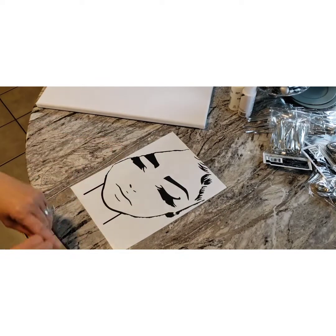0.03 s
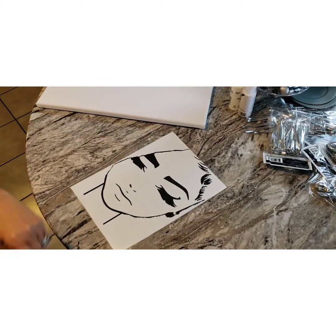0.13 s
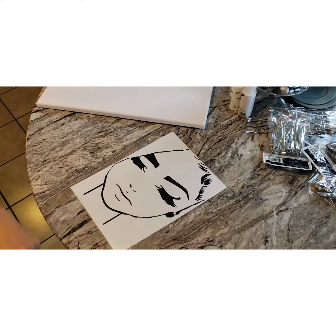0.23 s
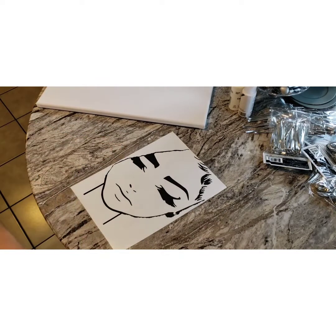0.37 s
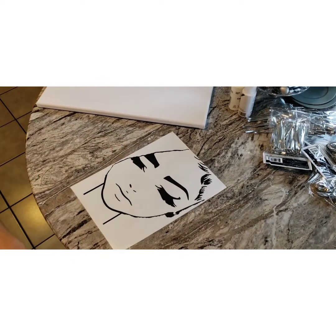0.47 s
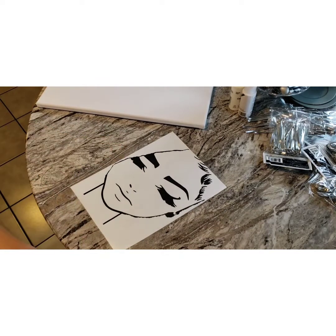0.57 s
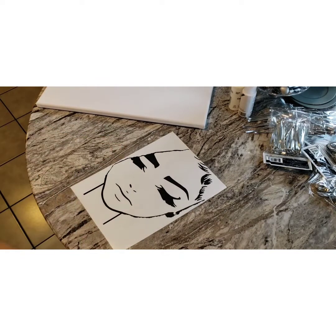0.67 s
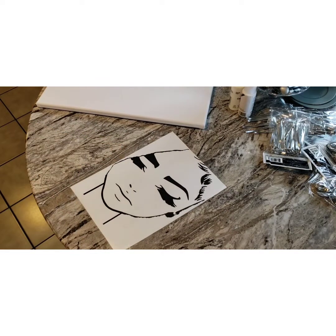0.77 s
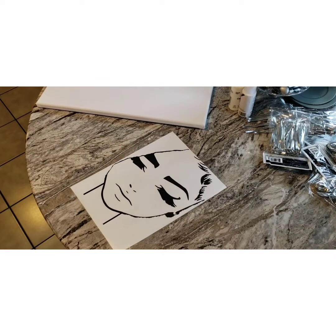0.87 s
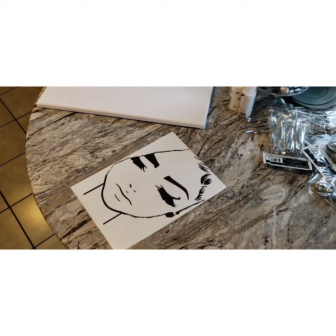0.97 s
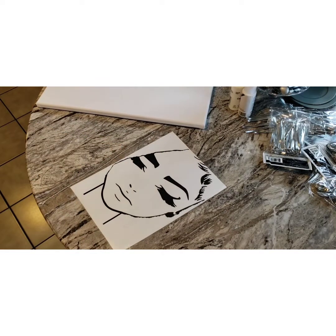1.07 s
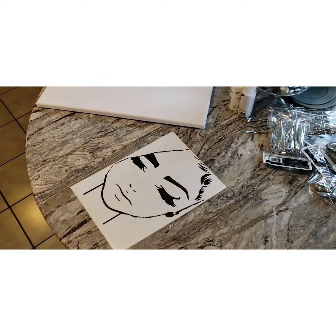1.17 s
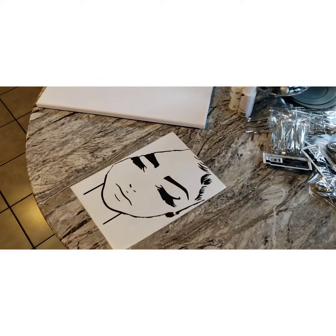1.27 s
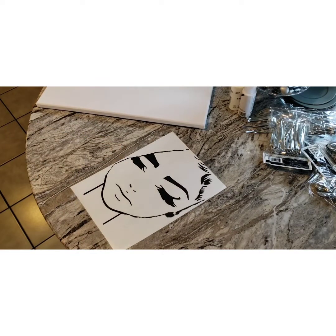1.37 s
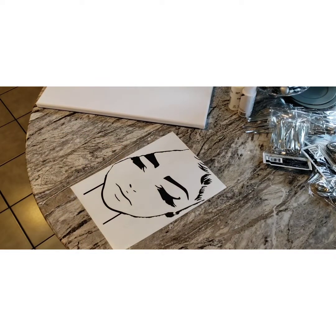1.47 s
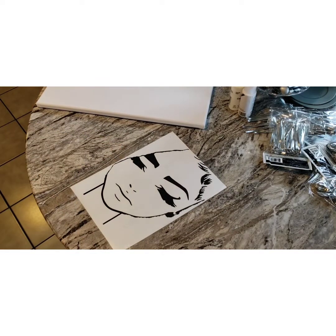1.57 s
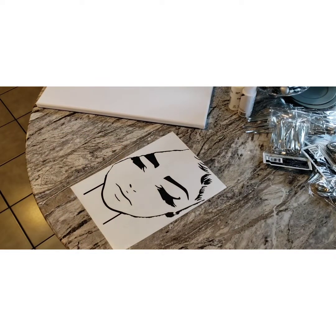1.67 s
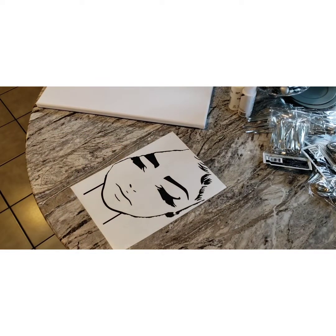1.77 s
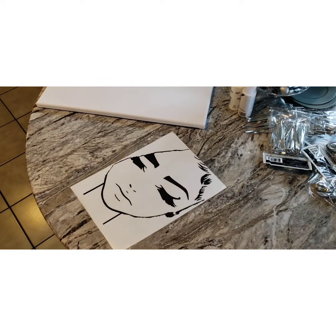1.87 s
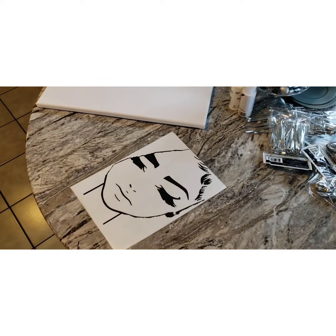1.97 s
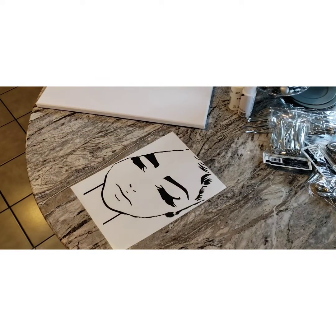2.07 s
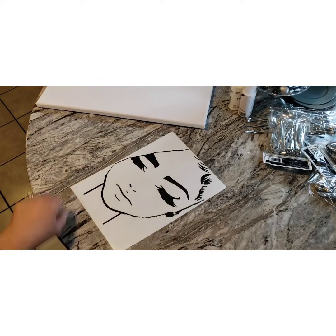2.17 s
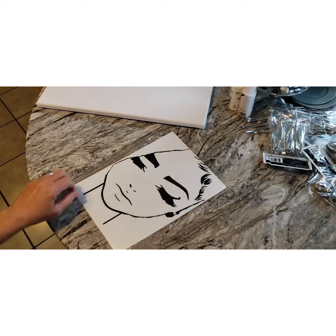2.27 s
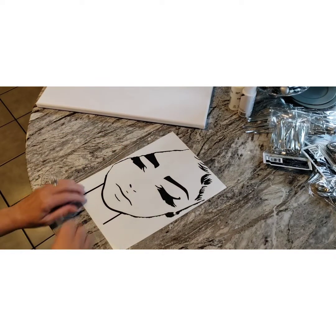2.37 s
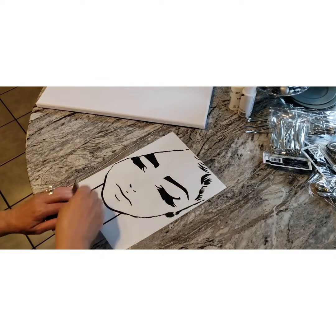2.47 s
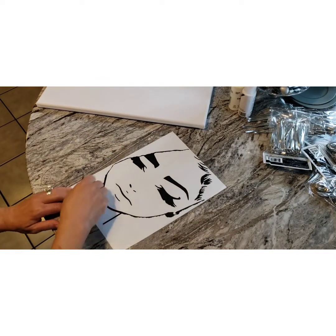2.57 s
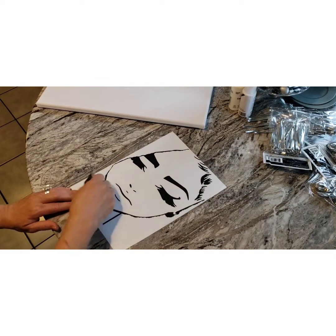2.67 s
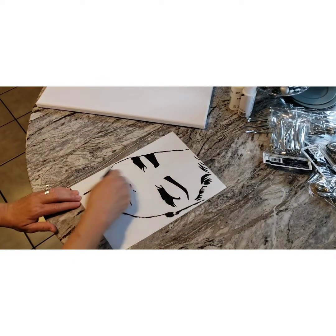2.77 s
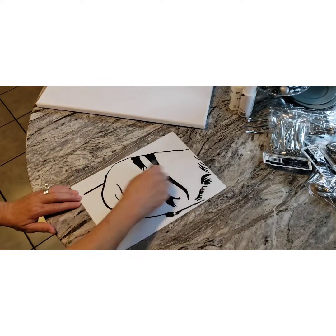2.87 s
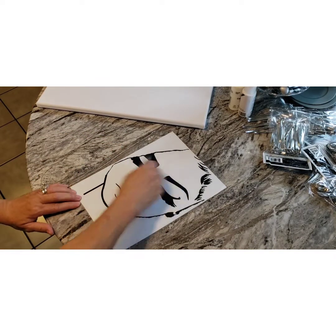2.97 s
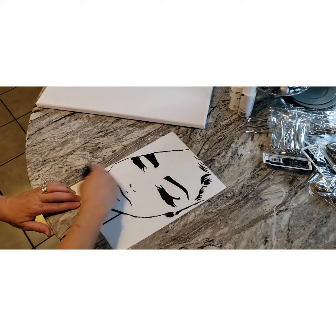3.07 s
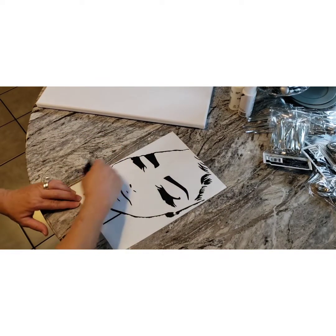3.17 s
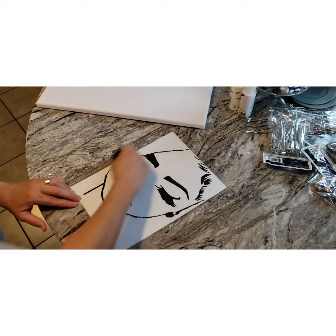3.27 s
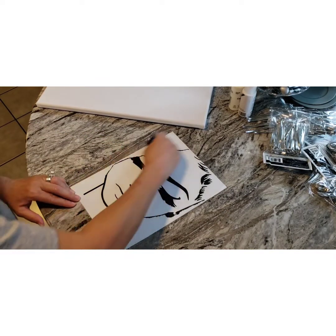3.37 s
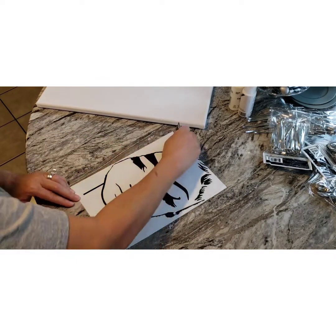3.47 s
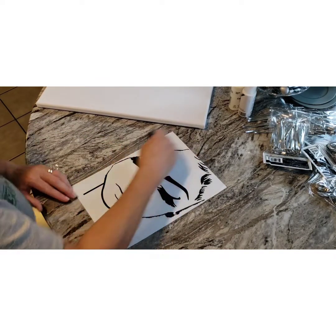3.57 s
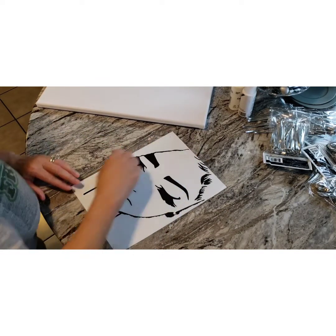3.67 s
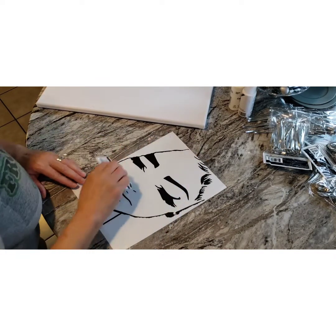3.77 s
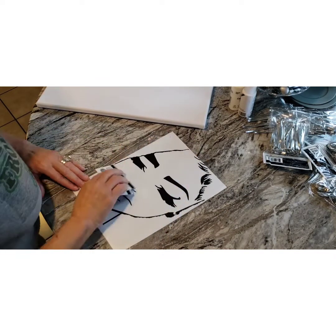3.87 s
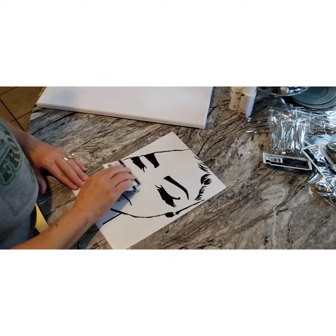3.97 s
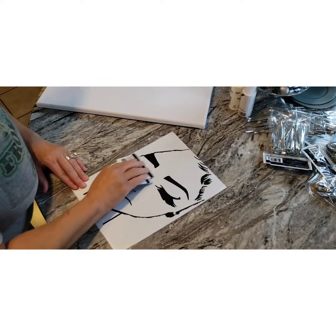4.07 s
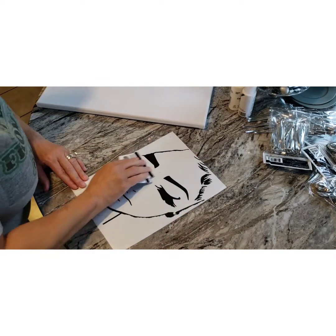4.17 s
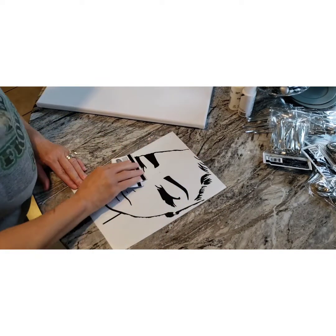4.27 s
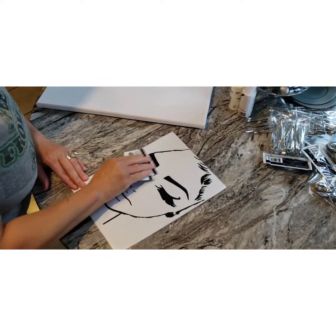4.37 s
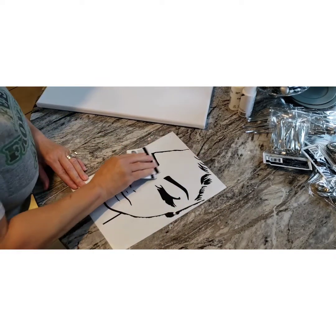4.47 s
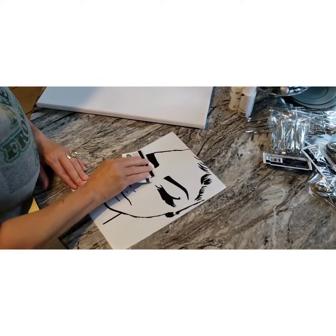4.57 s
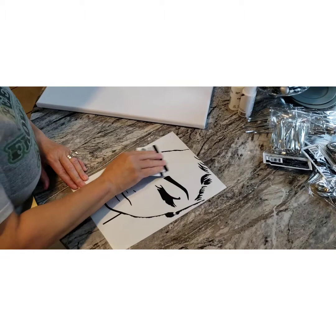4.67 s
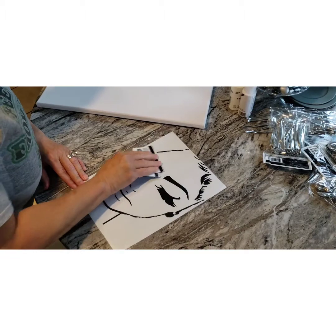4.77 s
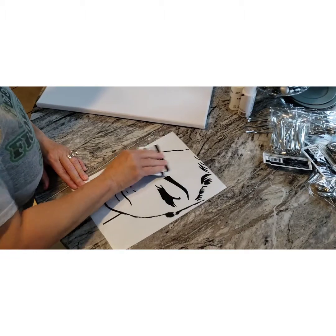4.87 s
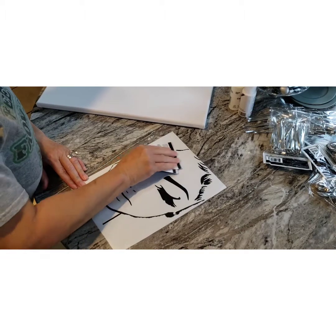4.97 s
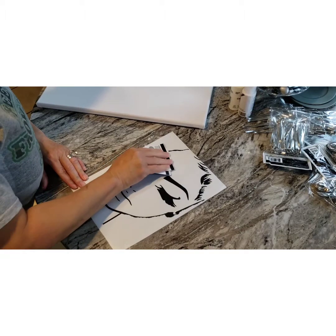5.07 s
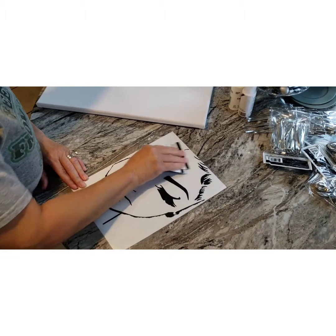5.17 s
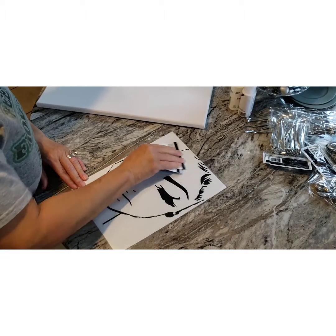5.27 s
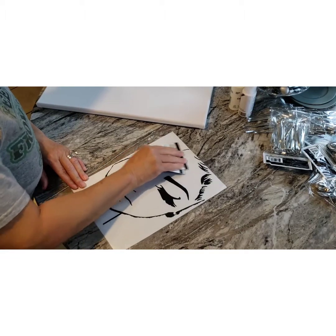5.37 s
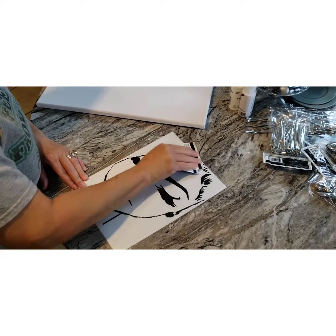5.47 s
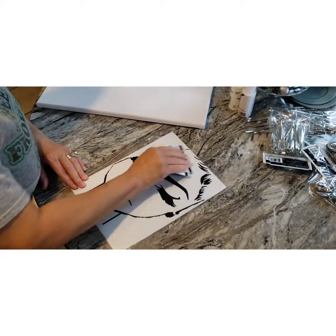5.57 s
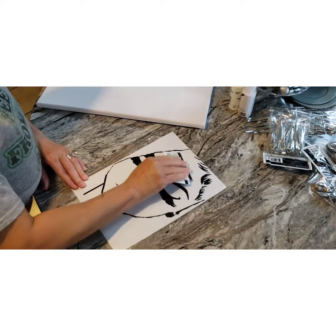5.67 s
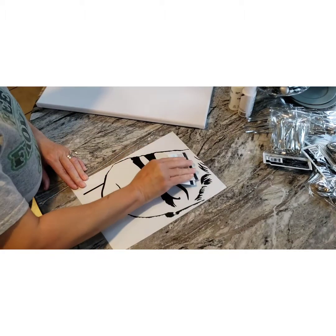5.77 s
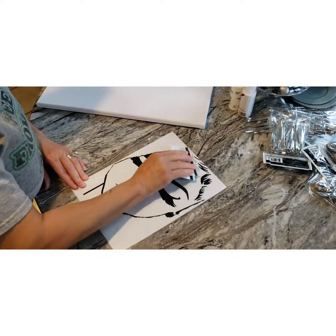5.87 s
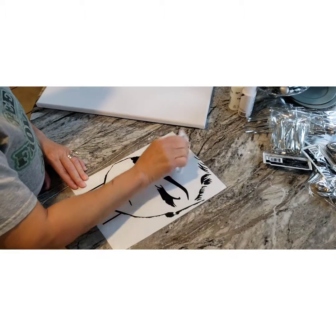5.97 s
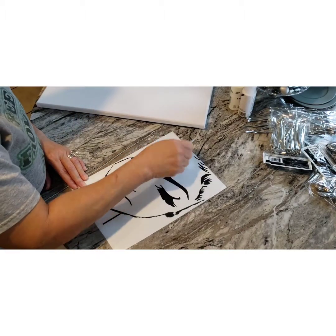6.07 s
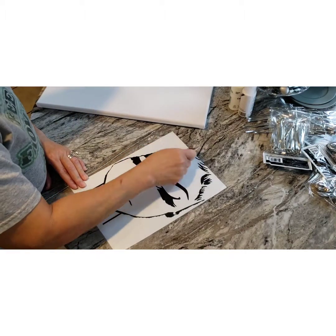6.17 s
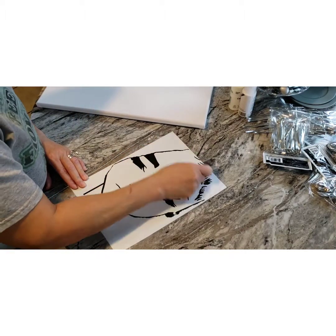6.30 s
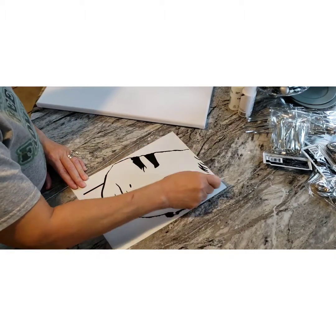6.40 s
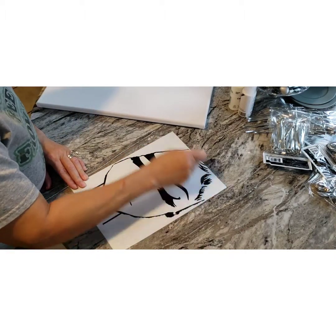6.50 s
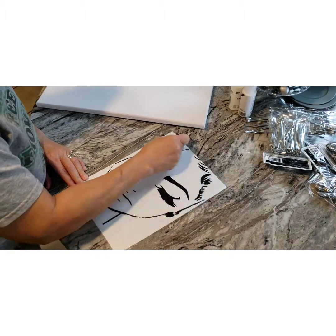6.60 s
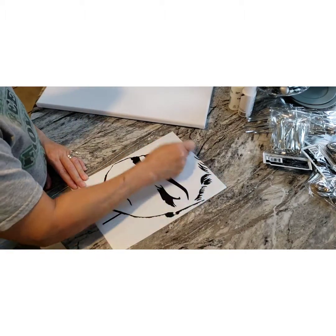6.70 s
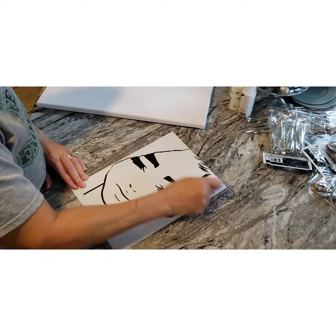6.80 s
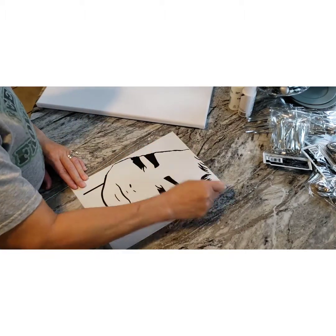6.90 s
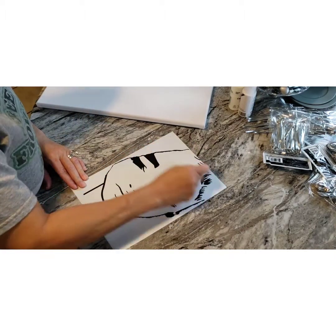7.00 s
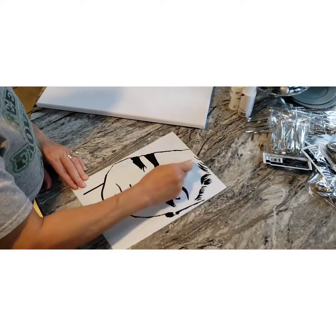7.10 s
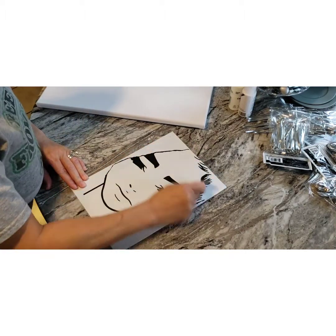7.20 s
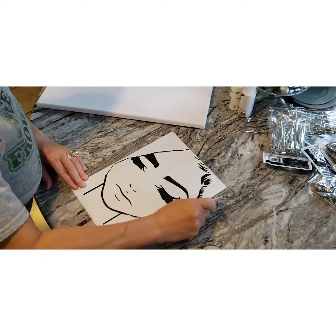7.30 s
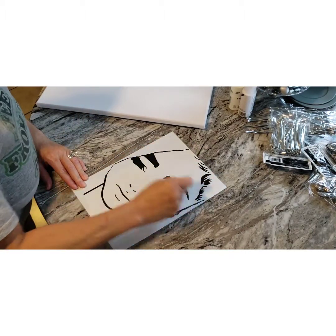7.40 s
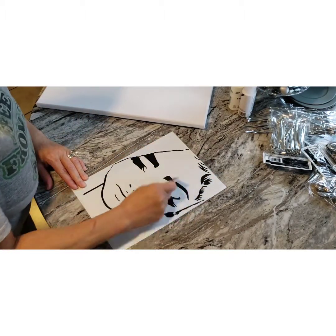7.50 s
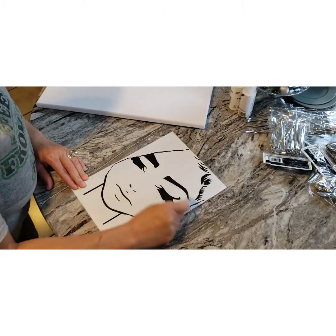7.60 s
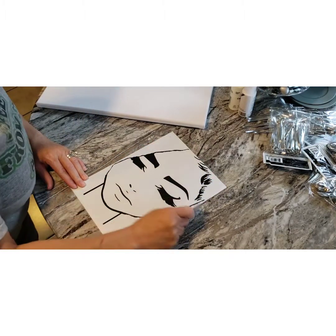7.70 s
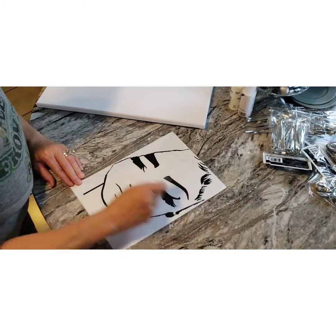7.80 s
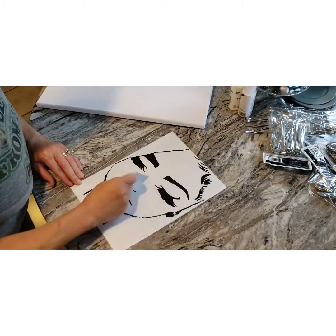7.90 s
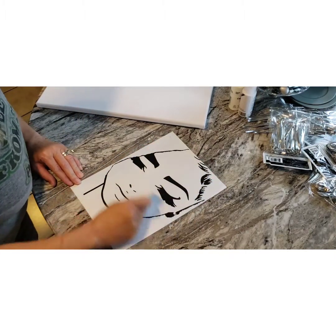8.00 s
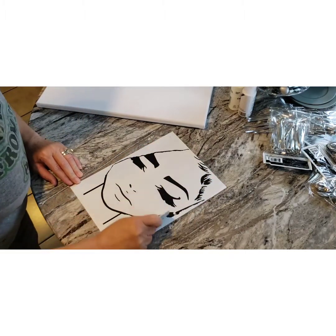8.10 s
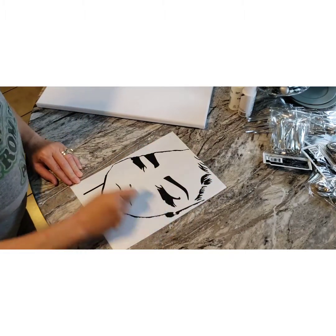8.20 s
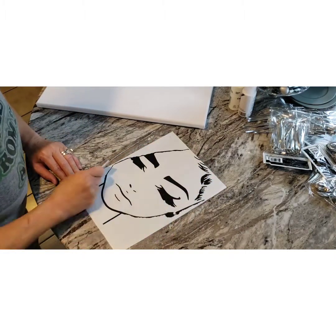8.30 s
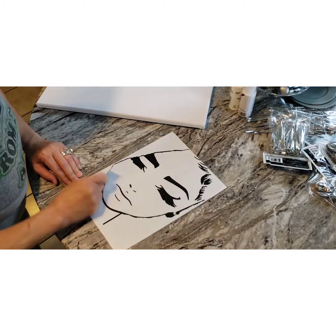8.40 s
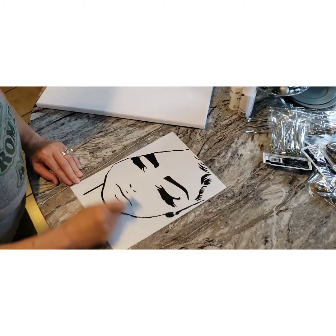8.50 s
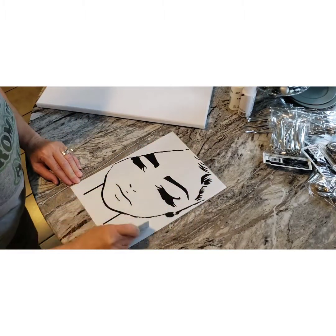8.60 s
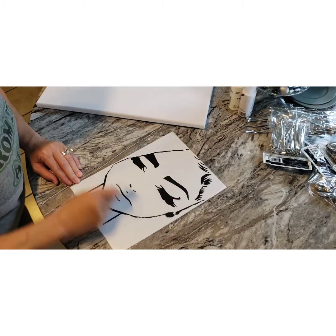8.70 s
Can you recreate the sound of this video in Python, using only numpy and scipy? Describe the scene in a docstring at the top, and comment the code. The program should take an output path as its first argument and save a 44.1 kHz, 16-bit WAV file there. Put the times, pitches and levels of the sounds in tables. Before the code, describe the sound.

Hard plastic card scrapes over a smooth sheet on a stone counter: two raspy opening strokes, soft quick rubbing, then six firm strokes over faint hum.

```python
"""Card burnishing vinyl on a kitchen counter

Hands brush a stone countertop and an appliance hums; after soft knocks and taps a plastic card makes two opening
strokes on vinyl and tape, rubs lightly to and fro, gives two short hissing scrapes that lead into the first of
six firm strokes, and its edge lands as these begin. Sticking and slipping are random kicks and noise that ring
the card and drum on the sheet; hands are filtered grain, the hum is sine lines over air noise. Random echoes
place card and hands in a small room, in stereo."""
import sys
import numpy as np
from scipy import signal
from scipy.fft import rfft, irfft, next_fast_len
from scipy.io import wavfile
from scipy.ndimage import map_coordinates

SR = 44100
rng = np.random.default_rng(int(sys.argv[2]) if len(sys.argv) > 2 else 0)


def wav_record(signal):
    """Record a signal, one row per channel, as 16-bit PCM in the file named by sys.argv[1]."""
    frames = np.transpose(np.atleast_2d(signal))
    bounded = np.clip(frames, -1, 1)
    # unit amplitude maps onto the largest positive 16-bit level
    quanta = np.round(bounded * 32767).astype(np.int16)
    wavfile.write(sys.argv[1], SR, quanta)


N = 385821  # length in samples

# Levels of card and hands are those at the source, before the room.
# hands brushing counter and sheet: start_s, rise_s, fade_s, rub_db, swish_db
HAND_BRUSHES = [(0, 0.0033, 0.053, -60.5, -65), (.12, .13, .12, -86, -68.5), (.42, .08, .09, -94, -71),
                (0.721, 0.035, 0.12, -76.5, -78), (.96, .02, 0.088, -79.5, -79.5),
                (1.42, 0.084, .08, -79.5, -76.5), (2.176, 0.066, 0.083, -68, -77),
                (2.27, 0.08, 0.11, -76, -64), (2.43, 0.029, 0.14, -72.5, -65), (2.63, 0.13, .08, -61, -71),
                (3.0, 0.041, .05, -64, -67.5), (3.7, 0.061, 0.08, -80, -70.5),
                (5.93, 0.053, 0.12, -87.5, -72)]
# motor lines of the appliance: pitch_hz, level_db
MOTOR_LINES = [(91.5, -73), (118.4, -67), (177.6, -61), (236.9, -83.5), (306.8, -68.5), (355.3, -67),
               (446.8, -70), (532.9, -77.5)]
# soft knocks and taps, and the card's edge landing: start_s, ring_db, crack_db, thud_db, ring_hz
KNOCKS_AND_LANDINGS = [(.762, -83, -95, -80, 1250), (2.573, -80, -78, -59, 2160),
                       (2.607, -57.5, -56.5, -58.5, 2820), (3.084, -45.5, -52, -73, 1850),
                       (5.937, -74, -86, -84, 1600), (6.15, -66, -61.5, -50.5, 1200),
                       (6.157, -54.5, -52, -54, 2280), (6.643, -55, -59.5, -58, 2170),
                       (7.104, -49.5, -48, -47.5, 1800), (7.51, -45.5, -49, -52, 1750),
                       (7.931, -58.5, -55.5, -55.5, 1860), (8.336, -54.5, -52.5, -51, 1560)]
# soft, deep bumps as weight shifts on the counter: start_s, level_db
WEIGHT_SHIFTS = [(2.431, -62), (5.48, -54), (7.109, -63), (7.515, -60), (7.936, -62), (8.344, -55)]
# firm strokes: start_s, speed_up_s, lift_off_s, rasp_db, scratch_db, hiss_db, drumming_db,
# card_resonance_hz, nominal_width_hz
FIRM_STROKES = [ (2.745, 0.17, 0.027, -31.5, -43, -38.5, -54.5, 2020, 1110),
                (3.087, 0.015, .02, -37.5, -46.5, -56, -65, 1890, 1100),
                (3.17, 0.098, 0.13, -33.5, -56, -46, -62.5, 1980, 960),
                (3.29, 0.15, 0.07, -33.5, -42.5, -42.5, -52.5, 2080, 1220),
                (6.289, 0.089, 0.072, -40.5, -52.5, -48.5, -49.5, 1520, 1680),
                (6.67, 0.18, 0.083, -36.5, -36.5, -38.5, -52, 1730, 1220),
                (7.115, 0.18, 0.049, -33.5, -40.5, -41.5, -56.5, 1640, 1087),
                (7.515, 0.14, 0.055, -37.5, -51.5, -45, -54, 1600, 1270),
                (7.95, 0.078, 0.088, -31.5, -43.5, -40.5, -56, 1660, 1200),
                (8.405, 0.16, 0.069, -33.5, -40.5, -40, -59.5, 1795, 1380)]
# the edge catching on a ridge of vinyl: start_s, level_db
RIDGE_CATCHES = [(3.373, -35), (6.289, -52), (6.768, -34), (7.281, -42), (8.023, -38), (8.543, -32.5)]
# light rubs to and fro, then two short hissing scrapes leading into the first firm stroke:
# start_s, speed_up_s, rasp_db, hiss_db
LIGHT_SCRAPES = [(3.829, 0.031, -53, -56), (3.865, 0.043, -53.5, -70), (3.99, 0.047, -48.5, -59.5),
                 (4.05, 0.053, -51.5, -55), (4.189, 0.041, -55, -53.5), (4.339, 0.062, -50, -49.5),
                 (4.485, 0.041, -56.5, -56.5), (4.631, 0.051, -51, -50), (4.74, 0.041, -58, -60),
                 (4.88, 0.062, -49, -49.5), (5.0, 0.042, -59, -59), (5.146, 0.039, -50.5, -51),
                 (5.261, 0.033, -59, -61.5), (5.4, 0.057, -49.5, -52.5), (5.555, 0.027, -43, -49.5),
                 (6.195, 0.031, -49, -51), (6.245, .045, -48.5, -55.5)]
# the hand leaning into the counter: start_s, boom_db
HAND_LEANS = [(4.019, -48), (4.068, -45), (4.157, -48), (5.482, -37.5), (5.557, -52), (6.8, -46),
              (6.89, -45)]
# low modes of the sheet on the counter: pitch_hz, width_hz, level_db
SHEET_MODES = [(72, 55, -1.5), (211.4, 85, 3.5), (369, 36, 4), (446, 77, 1.5), (916, 310, -10.5)]

# spectrum shapes: pitch_hz, relative_level_db
# fine slips, bright
HISS_SPECTRUM = [(2500, -23), (4500, 2), (6500, -2.5), (8500, 0), (11000, 3), (13500, 0.5), (16000, -1.5)]
# fine slips, mid-range
SCRATCH_SPECTRUM = [(300, -43), (700, -8.5), (1100, -7), (1800, -10), (2900, -2.5), (4800, -7.5),
                    (6500, -10.5), (12000, -43.5)]
# crack of a knock or landing
CRACK_SPECTRUM = [(200, -1), (600, -1), (1100, 2.5), (1900, -5), (3200, -3.5), (5000, -6), (7000, -13),
                  (16000, -52)]
# skin rubbing, low and mid-range
RUB_SPECTRUM = [(400, 2.5), (1000, -4.5), (3000, -1.5), (5000, -5), (7000, -12.5), (16000, -59)]
# skin swishing, treble
SWISH_SPECTRUM = [(3000, -37), (7000, -15.5), (11500, -3), (16000, -7)]
# rush of air from the appliance
AIR_SPECTRUM = [(20, -17), (50, -3.5), (100, -0.5), (150, -5), (200, 1.5), (260, -2), (380, -2),
                (530, -6.5), (720, -15), (1000, -26.5), (2500, -30.5), (5000, -37), (8000, -42.5),
                (12000, -29), (16000, -29)]

# likeness of diffuse sound at the two microphones: pitch_hz, correlation (1 = same, 0 = unrelated)
MICROPHONE_LIKENESS = [(60, 0.5), (140, 0.93), (300, 0.7), (600, 0.43), (1500, 0), (4000, 0)]
# decay of the room's tail: pitch_hz, t60_s
ROOM_DECAY = [(100, 0.21), (500, 0.54), (2000, 0.35), (6000, 0.36), (15000, 0.2)]
# the card's place across the table: time_s, left_microphone_lead_ms
CARD_PLACE = [(2.6, .05), (3.4, .02), (4, .08), (5.5, 0), (7.2, -.03), (7.7, 0), (8.1, .06), (8.6, .08)]

TOP_HZ = 16000  # upper band limit of the microphones
START_SPEED = 0.19  # share of top speed at first
SETTLE_SHARE = 0.068  # part of the speed-up in which the pressure builds
LIFT_SHAPE, SLOWING = 1.93, 0.14  # exponents: curve of the lift-off; speed falls as this power of it
RASP_LAW, SCRATCH_LAW, HISS_LAW, DRUM_LAW = 1.61, 2.9, 2.2, 0.42  # each layer grows as this power of speed
SLOW_RING = 0.86  # while slow, the card rings at this share of its resonance
LIGHT_LIFT_S, LIGHT_HZ, LIGHT_WIDTH_HZ = 0.043, 1735, 1950  # loose grip of light scrapes; width is nominal
LIGHT_SCRATCH_DB, LIGHT_DRUM_DB = 0, -11  # scratch over hiss; drumming over rasp
DRAG_START_S, DRAG_LENGTH_S, DRAG_FADE_S = 3.85, 1.83, 0.05
DRAG_DB, DRAG_SWISH_DB = -59, -13  # mean level of the rumble; swish over it
CLICK_DB, CHATTER_S = -2.5, 0.18  # first blow over the chatter after it; the chatter's t60
SNAP_DB = -6  # bright snap of a knock or landing, over its crack
COUNTER_HZ, BOOM_RISE_S, BUMP_RISE_S = 136.85, 0.032, 0.076
TAP_BOOM_DB, DRUM_BOOM_DB = 8, 0  # the counter's boom: over a thud; over the sheet's drumming


def amp(db):
    """Decibels to gain."""
    return 10 ** (np.asarray(db) / 20)


def unit(x):
    """Scale to rms 1."""
    return x / np.sqrt(np.mean(x ** 2) + 1e-20)


def along(points, hz):
    """Interpolate (Hz, value) points on a log frequency axis."""
    f, v = np.transpose(points)
    return np.interp(np.log(hz + 1), np.log(f + 1), v)


def add(track, s, x):
    """Mix x into the track at time s, cut to the track's ends."""
    start = round(s * SR)
    x = x[max(-start, 0):N - start]
    track[max(start, 0):][:len(x)] += x


def wobble(rate, size):
    """A smooth random curve, rate knots a second."""
    knots = rng.standard_normal(int(size * rate / SR) + 4)
    return map_coordinates(knots, [np.arange(size) * rate / SR])


def filtered(x, response):
    """x times a complex response of frequency."""
    size = x.shape[-1]
    m = 2 * next_fast_len(size // 2 + 4096)
    return irfft(rfft(x, m) * response(np.fft.rfftfreq(m, 1 / SR)), m)[..., :size]


def coloured(x, spectrum):
    """x through a causal filter with the given spectrum."""
    def response(hz):
        # folding the cepstrum onto positive times gives minimum phase
        cepstrum = irfft(np.log(amp(along(spectrum, hz))))
        half = len(cepstrum) // 2
        return np.exp(rfft(np.r_[cepstrum[0], 2 * cepstrum[1:half]], 2 * half))
    return filtered(x, response)


def resonance(hz, centre, width):
    """Response of one damped mode, 1 at its centre."""
    return 1j * hz * width / (centre ** 2 - hz ** 2 + 1j * hz * width)


def slips(size, rate, spread_db, smooth):
    """Tiny slips of uneven strength at random moments, over smooth sliding noise; rate in slips a second."""
    kicks = (rng.random(size) < rate / SR) * amp(spread_db * np.clip(rng.standard_normal(size), -2, 2))
    return unit(kicks * rng.choice([-1, 1], size)) + smooth * rng.standard_normal(size)


def glide(rise, fall):
    """Speed and contact pressure of one sweep of the hand: it settles, speeds up, then lifts off and slows."""
    t = np.arange(0, rise + 4 * fall, 1 / SR)
    progress = np.minimum(t / rise, 1)
    settle = np.minimum(progress / SETTLE_SHARE, 1)
    lift = np.exp(-(np.maximum(t - rise, 0) / fall) ** LIFT_SHAPE)
    speed = START_SPEED + (1 - START_SPEED) * np.sin(np.pi / 2 * progress)
    return speed * lift ** SLOWING, settle * lift


def hands():
    """Skin slides faintly over counter and sheet: random grain, shaped by the speed and pressure of the hand."""
    out = np.zeros(N)
    for s, rise, fall, rub_db, swish_db in HAND_BRUSHES:
        speed, press = glide(rise, fall)
        grain = slips(len(speed), rate=2500, spread_db=5, smooth=.9)
        rub = amp(rub_db) * unit(coloured(grain, RUB_SPECTRUM))
        swish = amp(swish_db) * unit(coloured(grain, SWISH_SPECTRUM))
        add(out, s, speed * press * (rub + swish))
    return out


def diffuse(pair):
    """Two unrelated noises as the microphones hear a room: alike in the bass, apart in the treble."""
    def turn(hz):
        return np.arccos(np.clip(along(MICROPHONE_LIKENESS, hz), -1, 1)) / 2

    mid, side = filtered(pair, lambda hz: np.array([np.cos(turn(hz)), np.sin(turn(hz))]))
    return np.array([mid + side, mid - side])


def appliance():
    """Motor lines, slightly unsteady in level and phase, over a low rush of air."""
    t = np.arange(N) / SR
    hum = 0
    for hz, db in MOTOR_LINES:
        level = amp(db + 0.9 * wobble(3.1, N))
        hum = hum + level * np.sin(2 * np.pi * hz * t + .5 * wobble(7.6, N))
    air = diffuse(coloured(rng.standard_normal((2, N)), AIR_SPECTRUM))
    return hum + amp(-61) * unit(air)


def card(hz, centre, width):
    """The card's broad bending resonance with a sharper ring at its peak."""
    broad = resonance(hz, centre, 1.253 * width) ** 2
    return broad * (1 + amp(-4.5) * resonance(hz, centre, 0.22 * width))


def sheet(x):
    """Force on the sheet, heard through its low modes, which alternate in sign."""
    def response(hz):
        return sum((-1) ** k * amp(db) * resonance(hz, centre, width)
                   for k, (centre, width, db) in enumerate(SHEET_MODES))
    return filtered(x, response)


def knocks_and_landings():
    """Soft knocks, taps and landings of the edge: a click and dying chatter, over a thud through the sheet."""
    out, t = np.zeros(N), np.arange(SR // 4) / SR

    def contact(click_db):
        """One sharp blow followed by dying chatter."""
        chatter = slips(len(t), rate=980, spread_db=2.5, smooth=0.92) * amp(-60 * t / CHATTER_S)
        return unit(chatter) + amp(click_db) * unit(1. * (t == 0))

    for s, ring_db, crack_db, thud_db, ring_hz in KNOCKS_AND_LANDINGS:
        ring = amp(ring_db) * unit(filtered(contact(click_db=-16), lambda hz: card(hz, ring_hz, 1200)))
        crack = amp(crack_db) * unit(coloured(contact(CLICK_DB), CRACK_SPECTRUM))
        snap = amp(crack_db + SNAP_DB) * unit(coloured(contact(CLICK_DB), HISS_SPECTRUM))
        weight = rng.standard_normal(len(t)) * (1 - np.exp(-t / 0.0056)) * amp(-60 * t / 0.2)
        thud = amp(thud_db) * unit(sheet(weight))
        add(out, s, ring + crack + snap + thud)
    return out


def swell(db, rise):
    """Envelope that peaks after the rise time and dies more slowly."""
    u = np.arange(0, 5 * rise, 1 / SR) / rise
    return amp(db) * (u * np.exp(1 - u)) ** 2


def boom(envelope):
    """The slab's one strong low mode, wavering in phase and strength."""
    size = len(envelope)
    turns = COUNTER_HZ * np.arange(size) / SR + 0.082 * wobble(42.0, size)
    return envelope * amp(0.73 * wobble(49, size)) * np.sin(2 * np.pi * turns)


def bump(envelope):
    """The soft, deep give of the counter under the arm: noise through a broad mode."""
    noise = rng.standard_normal(len(envelope))
    return envelope * unit(filtered(noise, lambda hz: resonance(hz, 49, 60) ** 2))


def counter():
    """Every knock, landing and lean of the hand makes the slab boom; it gives dully under the arm."""
    out = np.zeros(N)
    thud_booms = [(s, thud_db + TAP_BOOM_DB) for s, _, _, thud_db, _ in KNOCKS_AND_LANDINGS]
    for s, db in thud_booms + list(HAND_LEANS):
        add(out, s, boom(swell(db, BOOM_RISE_S)))
    for s, db in WEIGHT_SHIFTS:
        add(out, s, bump(swell(db, BUMP_RISE_S)))
    return out


def drumming(envelope, force):
    """Slips drum on the sheet and set the counter under it booming."""
    return envelope * unit(sheet(force)) + boom(amp(DRUM_BOOM_DB) * envelope)


def scrape(rise, fall, rasp_db, scratch_db, hiss_db, drum_db, card_hz, width_hz):
    """Coarse slips ring the card and drum the sheet; fine ones scratch and hiss as the card speeds up."""
    speed, press = glide(rise, fall)
    size = len(speed)
    judder = amp(0.81 * wobble(122.1, size))
    coarse = judder * slips(size, rate=800, spread_db=0.5, smooth=0.68)

    # the ring climbs from its slow pitch to its full pitch with speed
    slow = unit(filtered(coarse, lambda hz: card(hz, SLOW_RING * card_hz, width_hz)))
    fast = unit(filtered(coarse, lambda hz: card(hz, card_hz, width_hz)))
    rasp = amp(rasp_db) * speed ** RASP_LAW * (slow + speed ** 2 * (fast - slow))

    fine = judder * slips(size, rate=3800, spread_db=5.0, smooth=1.0)
    hiss = amp(hiss_db) * speed ** HISS_LAW * unit(coloured(fine, HISS_SPECTRUM))
    medium = judder * slips(size, rate=2000, spread_db=1.5, smooth=1.0)
    scratch = amp(scratch_db) * speed ** SCRATCH_LAW * unit(coloured(medium, SCRATCH_SPECTRUM))
    drum = drumming(amp(drum_db) * speed ** DRUM_LAW, coarse)
    return press * (rasp + hiss + scratch + drum)


def scraping():
    """Firm strokes, each with its own grip, and light rubs and short hissing scrapes that share a loose one."""
    out = np.zeros(N)
    for s, *stroke in FIRM_STROKES:
        add(out, s, scrape(*stroke))
    for s, rise, rasp_db, hiss_db in LIGHT_SCRAPES:
        light = scrape(rise, LIGHT_LIFT_S, rasp_db, hiss_db + LIGHT_SCRATCH_DB, hiss_db,
                       rasp_db + LIGHT_DRUM_DB, LIGHT_HZ, LIGHT_WIDTH_HZ)
        add(out, s, light)
    return out


def catches():
    """The edge jumps a ridge with a bright tick: a very short noise burst."""
    out, t = np.zeros(N), np.arange(SR // 50) / SR
    for s, db in RIDGE_CATCHES:
        tick = rng.standard_normal(len(t)) * amp(-60 * t / .003)
        add(out, s, amp(db) * unit(coloured(tick, HISS_SPECTRUM) + coloured(tick, SCRATCH_SPECTRUM)))
    return out


def dragging():
    """The heel of the hand stays down through the rubbing to and fro, rumbling and swishing on the sheet."""
    out, t = np.zeros(N), np.arange(0, DRAG_LENGTH_S, 1 / SR)
    contact = np.clip(np.minimum(t, DRAG_LENGTH_S - t) / DRAG_FADE_S, 0, 1)
    weight = contact * amp(DRAG_DB + 2.9 * wobble(18.3, len(t)))
    grain = slips(len(t), rate=800, spread_db=1.0, smooth=0.67)
    swish = amp(DRAG_SWISH_DB) * weight * unit(coloured(grain, SWISH_SPECTRUM))
    add(out, DRAG_START_S, drumming(weight, grain) + swish)
    return out


def echoes(early_db, tail_db):
    """One stereo response: quick reflections off counter and cupboards, then the room's short tail."""
    hz, t, z = signal.stft(rng.standard_normal((2, SR // 2)), SR, nperseg=256)
    decay = amp(-60 * t / along(ROOM_DECAY, hz)[:, None])
    tail = signal.istft(z * decay, SR, nperseg=256)[1]
    t = np.arange(tail.shape[1]) / SR
    # sparse random reflections, none in the first millisecond
    early = rng.standard_normal(tail.shape) * (rng.random(tail.shape) < .08)
    early = early * amp(-60 * t / .11) * (t > .001)
    tail = tail * np.clip(t / 0.0015, 0, 1)
    return amp(early_db) * early / np.linalg.norm(early[0]) + amp(tail_db) * tail / np.linalg.norm(tail[0])


def kitchen(x):
    """The travelling card keeps shifting, at random, among echo patterns; in the bass direct sound dominates."""
    shares = np.array([wobble(50, N) for _ in range(14)])
    shares /= np.linalg.norm(shares, axis=0)  # constant total power
    wet = 0
    for share in shares:
        pattern = echoes(early_db=2.0, tail_db=1.5)
        wet = wet + signal.fftconvolve((share * x)[None], pattern, axes=1)[:, :N]
    wet_level = [(100, -8), (450, -3), (1500, -1), (4000, 0)]  # pitch_hz, level_db
    wet = filtered(diffuse(wet), lambda hz: amp(along(wet_level, hz)))

    # direct sound reaches the two microphones at slightly different times
    index = np.arange(N)
    lead = np.interp(index / SR, *np.transpose(CARD_PLACE)) * SR / 1000  # in samples
    direct = np.array([map_coordinates(x, [index + side * lead / 2]) for side in (1, -1)])
    return amp(-3.5) * (direct + wet)


def scene():
    """Card and hands sound in the kitchen, treble leaning right; counter and appliance join without its echoes."""
    work = kitchen(scraping() + dragging() + knocks_and_landings() + catches() + hands())

    def lean(hz):
        """Half the level difference, left over right, in dB."""
        return along([(1500, .5), (4000, 0), (8000, -2.2)], hz) / 2

    work = filtered(work, lambda hz: amp([lean(hz), -lean(hz)]))
    return work + counter() + appliance()


def record(dry):
    """The microphones keep nothing from their band limit up."""
    return filtered(dry, lambda hz: hz < TOP_HZ)


dry = scene()
out = record(dry)
wav_record(out)
```